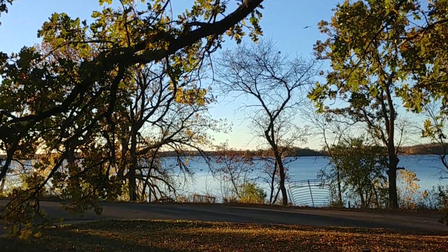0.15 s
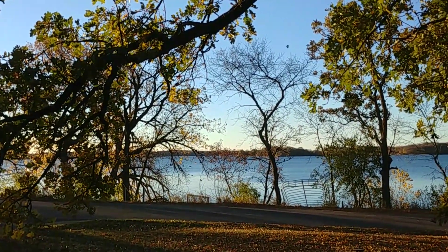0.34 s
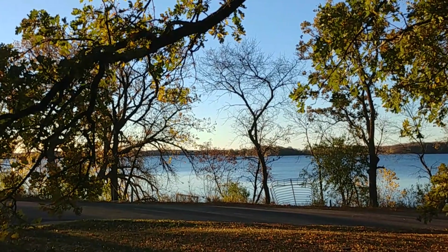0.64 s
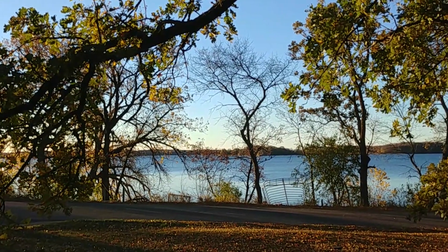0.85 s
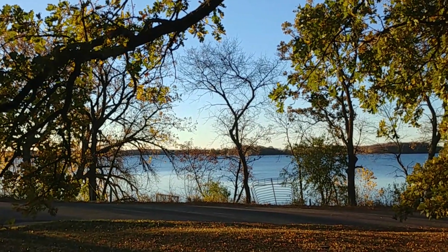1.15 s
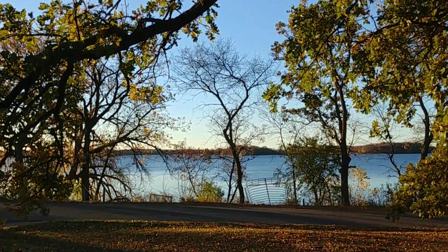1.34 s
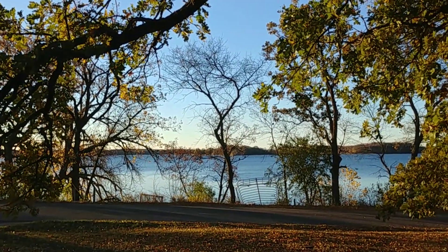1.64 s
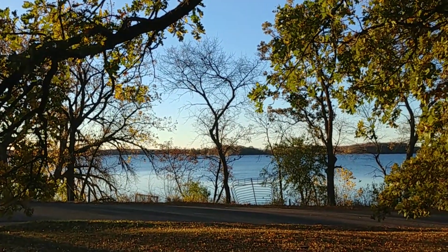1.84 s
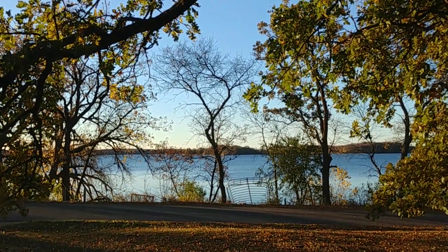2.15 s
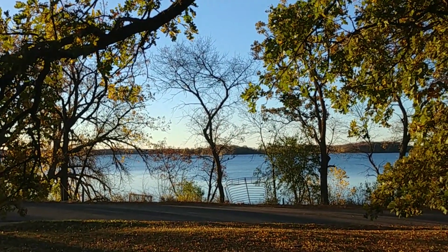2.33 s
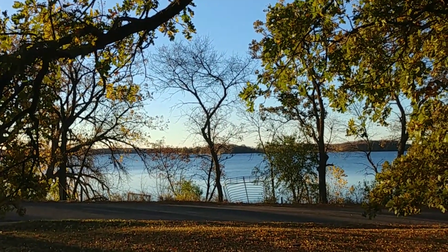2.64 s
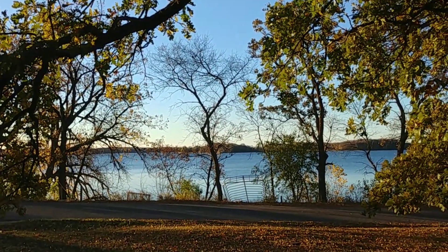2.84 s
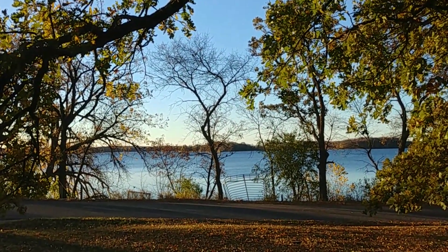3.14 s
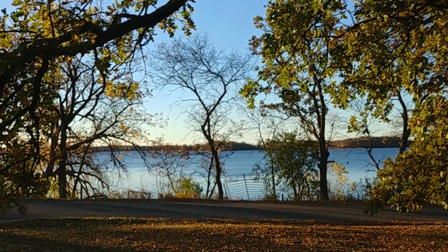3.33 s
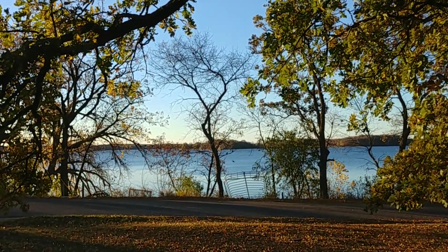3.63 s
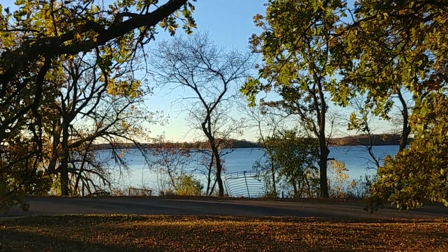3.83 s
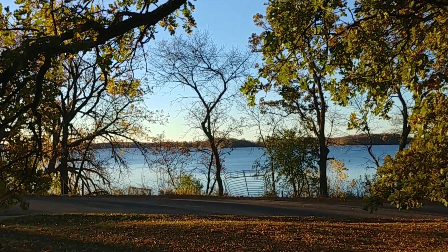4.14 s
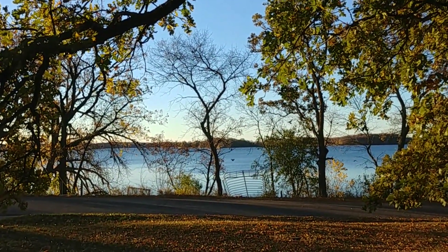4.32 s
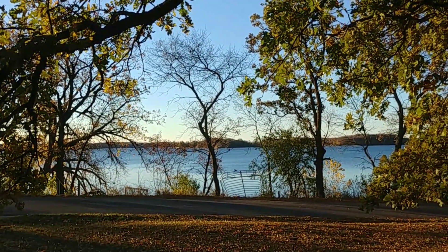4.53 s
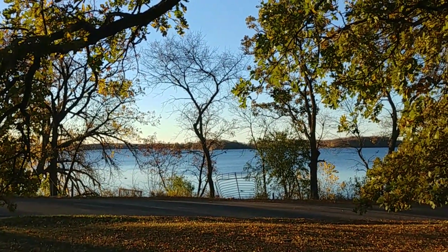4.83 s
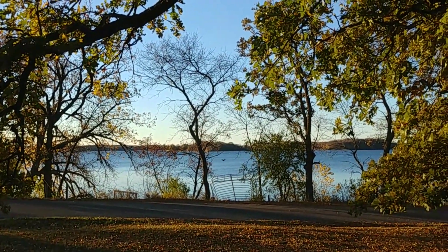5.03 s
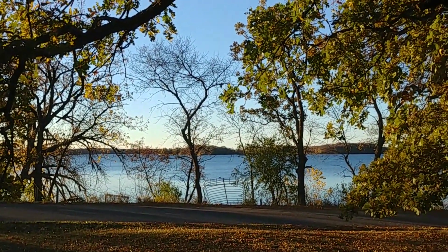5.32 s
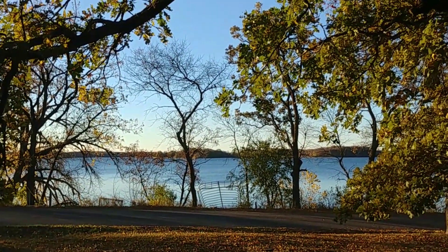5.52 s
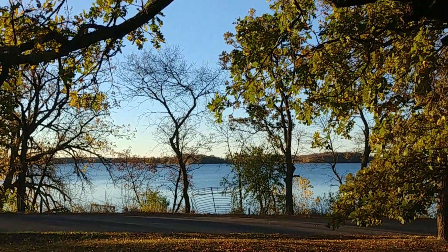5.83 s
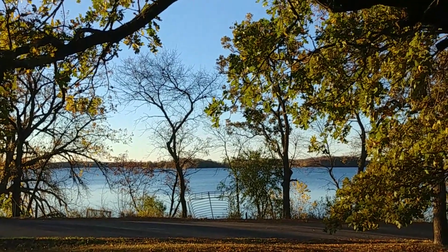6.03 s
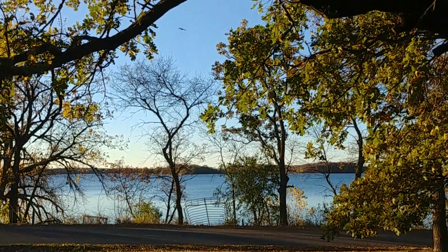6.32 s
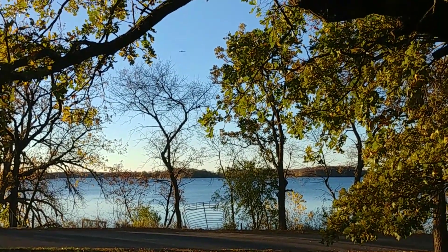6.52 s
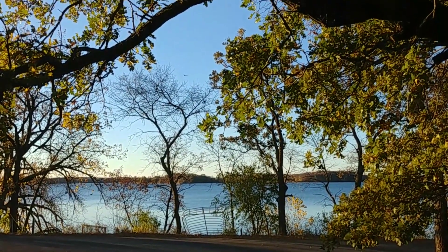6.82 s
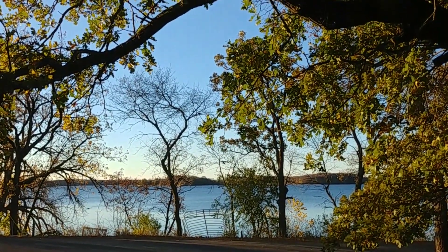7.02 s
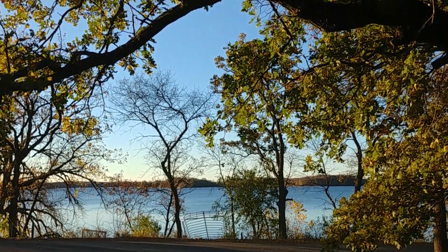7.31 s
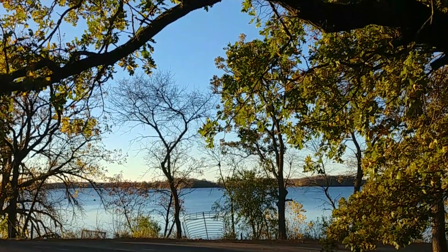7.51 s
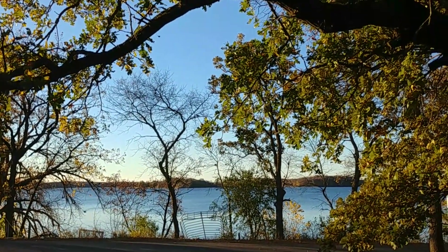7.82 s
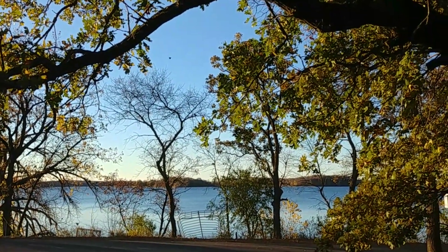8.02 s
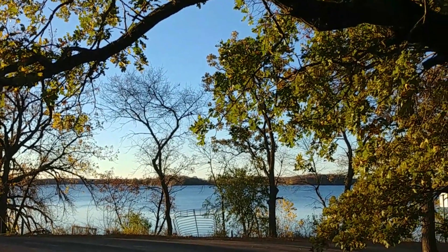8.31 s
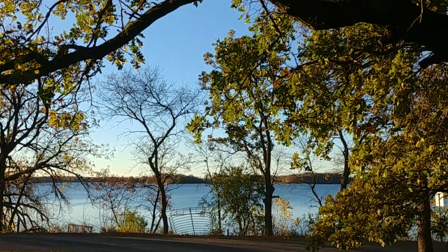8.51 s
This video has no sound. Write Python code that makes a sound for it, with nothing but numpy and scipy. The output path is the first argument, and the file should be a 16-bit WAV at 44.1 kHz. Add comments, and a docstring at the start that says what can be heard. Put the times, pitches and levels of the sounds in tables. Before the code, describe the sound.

A large flock of blackbirds chatters in lakeside trees for nearly nine seconds. Nearer birds overlap in short harsh calls, squeaky whistles and tiny pips, several each second, with a light echo from the trees. Behind them the distant flock makes a continuous blurred twittering that gently rises and falls.

The calls are busy in the first second, ease slightly between about 1 and 2 seconds, then carry on unevenly. The loudest stretch comes from about 5.5 to 6.7 seconds, with sharper chirps, a thin high whistle and three brief low clucks. The chatter continues, with more high whistles just after 8 seconds and a sharp raspy call near 8.6 seconds.

A faint distant rumble, soft hiss and very quiet electrical hum stay steady underneath. The sound is wide and open, with the nearer birds a little to the left.

```python
"""Blackbirds roosting in lakeside trees: harsh chacks, low chucks, squeaky whistles, short pips.
Uneven slaps of the voice membranes make the chacks, near-regular ones the chucks; whistles and pips
are trembling near-sines. Trunks and leaves scatter every call. Behind the near birds: blurred chatter
of the far flock, distant rumble, hiss, transformer hum. Two spaced microphones."""
import sys
import numpy as np
from scipy import signal
from scipy.fft import rfft, irfft, next_fast_len
from scipy.io import wavfile
from scipy.ndimage import uniform_filter1d

SR = 44100
rng = np.random.default_rng(int(sys.argv[2]) if len(sys.argv) > 2 else 0)


def output_pcm(signal):
    """Save a mono or channel-first signal as 16-bit PCM at the path in sys.argv[1].

    Samples are clipped to [-1, 1] before scaling.
    """
    pcm = np.clip(np.atleast_2d(signal).T, -1, 1) * 32767
    wavfile.write(sys.argv[1], SR, np.round(pcm).astype(np.int16))


N = 381906

# rumble and microphone hiss spectrum: f/Hz, relative density/dB
AIR_SPECTRUM = [(32, -35), (52, -1.5), (65, 0), (100, -2), (160, -7.5), (420, -11.5), (1200, -10.5),
                (8000, -19.5), (10500, -37), (13500, -24.5), (16000, -26.5)]
# left-right coherence of rumble and hiss: f/Hz, coherence/1
AIR_COHERENCE = [(60, 0.47), (200, 0.43), (700, 0.13), (1300, 0.059), (9000, 0), (15000, 0.35)]
# mains hum partials: f/Hz, level/dB
HUM_PARTIALS = [(120, -68.5), (240, -83.5)]
# far flock envelope: t/s, low-band level/dB, high-band level/dB
FAR_LEVELS = [(0.0, -54, -64), (0.53, -51.5, -61.5), (1.08, -54, -67.5), (1.61, -56, -66),
              (2.41, -49, -61.5), (2.72, -52.5, -65.5), (3.01, -53.5, -67.5), (3.98, -49.5, -60.5),
              (4.27, -58, -66), (4.75, -53.5, -59), (5.5, -48, -62.5), (5.67, -45, -50), (6.25, -52, -66),
              (6.68, -47.5, -62), (6.87, -50.5, -61.5), (7.96, -55, -65), (8.3, -48, -60.5),
              (8.66, -53, -67)]
# far flock spectrum: f/Hz, relative density/dB
FAR_SPECTRUM = [(410, -50.5), (700, -18.5), (1130, -12.5), (1280, -14.5), (1570, -5), (3110, -0.5),
                (3550, -1), (5400, -18), (6730, -20), (7770, -10), (8780, -25.5), (9800, -72),
                (12700, -101), (21600, -120)]
# where most birds sit: t/s, bearing/1 (-1 left, +1 right)
FLOCK_BEARING = [(0, .7), (5.3, .7), (5.6, -.6), (6.9, -.5), (7.2, .2)]
# throat response common to all chacks: f/Hz, gain/dB
THROAT_RESPONSE = [(500, -8.5), (791, -16), (1251, -11), (1766, -9), (2491, -3), (3133, -1), (3942, -4.5),
                   (4958, -14), (5561, -14.5), (6995, -14.5), (7846, -11.5), (8800, -20.5)]
# brief notes on one pitch: start t/s, f/Hz, level/dB, left over right/dB
PIPS = [(0.324, 2815, -39.5, 10), (0.338, 6100, -47.5, 7), (0.355, 2802, -42.5, 9.5),
        (0.437, 3500, -39, 1.5), (0.481, 2780, -40.5, 25), (0.545, 2950, -36.5, 5.5), (0.666, 2723, -32, 4),
        (0.7, 2865, -37, 14), (0.855, 2855, -43, 8), (1.035, 2820, -43.5, 14), (1.267, 2647, -43, 3.5),
        (1.303, 4010, -43, 18.5), (1.873, 3328, -37, 8.5), (1.893, 3320, -43, 15), (1.912, 3320, -47, 14),
        (2.3, 3250, -40, -3), (2.66, 6590, -55.5, -2), (3.024, 3570, -44, 14.5), (3.272, 3500, -42, 5),
        (3.75, 1873, -47, 7), (4.077, 3960, -43.5, 10.5), (4.785, 4530, -50, -3), (5.492, 2845, -34, 8.5),
        (5.893, 2590, -28.5, -1.5), (6.443, 4797, -41, 5), (6.872, 2496, -38, 4), (7.584, 3000, -40, 6),
        (8.452, 3040, -43, 6), (8.64, 7530, -41, -9)]
# voiced calls: centre t/s, length/s, pitch f/Hz, resonance f/Hz, level/dB
CHUCKS = [(5.543, 0.0215, 250, 1200, -46.5), (6.005, 0.028, 282.3, 1317, -44),
          (6.645, 0.024, 233, 1280, -41)]
# gliding notes: start t/s, length/s, start f/Hz, end f/Hz, level/dB
WHISTLES = [(0.06, 0.092, 4700, 4650, -59.5), (0.145, 0.13, 4560, 4520, -54), (0.27, 0.13, 4600, 4560, -53),
            (0.157, 0.18, 6670, 6930, -63), (0.375, 0.092, 7250, 7214, -51),
            (0.395, 0.09, 4050, 3130, -48.5), (0.5, 0.059, 3160, 3010, -38.5),
            (0.49, 0.106, 6250, 6160, -58), (0.543, 0.052, 4720, 4780, -62.5),
            (0.641, 0.072, 2774, 2740, -45.5), (1.05, 0.025, 3250, 3330, -46.5),
            (1.321, 0.1, 2006, 2024, -60), (1.415, 0.07, 3070, 2940, -55.5),
            (1.445, 0.065, 3660, 3800, -53), (1.45, 0.035, 2620, 2680, -52),
            (1.455, 0.077, 4170, 4050, -55.5), (1.56, 0.094, 4010, 4020, -60),
            (1.76, 0.085, 3700, 3680, -56), (1.85, 0.081, 3300, 3322, -47.5),
            (1.98, 0.089, 3535, 3500, -52), (2.093, 0.1, 7730, 7400, -54.5),
            (2.424, 0.0482, 3457, 3412, -43.5), (2.505, 0.083, 7770, 7700, -53),
            (2.615, 0.062, 4480, 4470, -48), (2.76, 0.049, 6150, 6150, -56.5),
            (2.8, 0.095, 7200, 4870, -56.5), (2.875, 0.055, 5100, 4730, -55.5),
            (2.925, 0.047, 4400, 4294, -54), (2.998, 0.081, 3570, 3535, -49),
            (3.09, 0.074, 3520, 3480, -63), (3.352, 0.041, 3440, 3300, -44),
            (3.455, 0.022, 3850, 3700, -55), (3.466, 0.025, 4470, 4470, -55), (3.5, 0.032, 3670, 3800, -54),
            (3.81, 0.026, 4600, 4573, -56), (3.849, 0.123, 7390, 7560, -62),
            (3.975, 0.04, 3900, 3976, -45.5), (4.093, 0.031, 3680, 3650, -45),
            (4.123, 0.0216, 3850, 3930, -45), (4.26, 0.14, 7620, 7640, -67),
            (4.307, 0.063, 3500, 3450, -50.5), (4.39, 0.12, 3460, 3470, -59),
            (4.183, 0.0106, 1460, 1480, -50), (4.472, 0.065, 4600, 4390, -50),
            (4.527, 0.067, 4020, 3130, -47), (4.76, 0.21, 7670, 7830, -72.5),
            (4.83, 0.12, 1604, 1725, -50.5), (5.0, 0.165, 4270, 4540, -55),
            (5.181, 0.11, 4530, 4600, -53.5), (5.01, 0.057, 3790, 3850, -53.5),
            (5.3, 0.048, 3500, 3400, -46.5), (5.345, 0.11, 3420, 3370, -43.5),
            (5.35, 0.0767, 2480, 2611, -49), (5.65, 0.03, 2850, 2834, -39), (5.61, 0.095, 6620, 7294, -50),
            (5.669, 0.12, 7840, 7500, -43), (5.71, 0.061, 709, 724, -64.5),
            (5.79, 0.122, 3330, 3564, -51.5), (5.9, 0.058, 2587, 2590, -42.5),
            (6.445, 0.0625, 3200, 3203, -46.5), (6.511, 0.0833, 3340, 3256, -45.5),
            (6.528, 0.09, 5050, 5000, -59.5), (6.256, 0.04, 3130, 3130, -46.5),
            (6.412, 0.051, 2600, 2391, -44), (6.5, 0.12, 2540, 2600, -47.5),
            (6.85, 0.09, 6470, 7030, -57.5), (7.009, 0.12, 4550, 4500, -58),
            (7.495, 0.17, 6780, 6810, -59.5), (7.564, 0.054, 3020, 2980, -44.5),
            (7.735, 0.06, 3550, 3530, -59.5), (7.93, 0.057, 3100, 3150, -55),
            (7.975, 0.0386, 2650, 2700, -48.5), (8.0, 0.045, 3150, 3230, -45),
            (8.15, 0.049, 7230, 7180, -43), (8.225, 0.0573, 6860, 7210, -50),
            (8.29, 0.065, 3850, 3820, -54), (8.39, 0.06, 3720, 3800, -52), (8.485, 0.15, 7800, 7100, -63)]
# harsh calls: centre t/s, length/s, band centre f/Hz, spread/octaves, level/dB
CHACKS = [(0.042, 0.061, 3030, 0.71, -50.5), (0.148, 0.088, 3820, 0.16, -49.5),
          (0.259, 0.058, 4320, 0.341, -44.5), (0.383, 0.09, 2680, 0.25, -46),
          (0.373, 0.075, 6600, 0.1, -46.5), (0.375, 0.043, 5020, 0.22, -42),
          (0.449, 0.14, 2390, 0.167, -50), (0.521, 0.0602, 3170, 0.27, -39.5),
          (0.523, 0.057, 5270, 0.18, -40.5), (0.681, 0.045, 1504, 0.525, -46),
          (0.721, 0.087, 3370, 0.41, -41.5), (0.716, 0.078, 5520, 0.38, -41.5),
          (0.79, 0.029, 2184, 0.8, -50), (0.837, 0.0365, 1063, 0.54, -50.5),
          (0.889, 0.057, 3080, 0.43, -40.5), (1.035, 0.032, 2089, 0.25, -50.5),
          (1.077, 0.0675, 3000, 0.39, -45), (1.201, 0.096, 3020, 0.33, -59.5),
          (1.298, 0.1096, 2043, 0.77, -48.5), (1.335, 0.0727, 4060, 0.14, -47.5),
          (1.428, 0.044, 7480, 0.217, -51.5), (1.446, 0.064, 4340, 2, -46.5),
          (1.57, 0.134, 7840, 0.044, -64.5), (1.603, 0.043, 1431, 0.45, -58),
          (1.729, 0.054, 2190, 0.62, -55), (1.838, 0.0506, 6540, 0.18, -60.5),
          (1.945, 0.061, 3700, 0.2446, -44.5), (2.07, 0.0534, 2000, 1, -51.5),
          (2.248, 0.055, 2975, 0.24, -44.5), (2.327, 0.075, 2953, 0.29, -43),
          (2.462, 0.1162, 3400, 0.27, -49.5), (2.539, 0.056, 1650, 0.72, -50.5),
          (2.572, 0.2, 8830, 0.135, -57), (2.669, 0.104, 4640, 0.1166, -50.5),
          (2.777, 0.026, 3760, 0.58, -46.5), (2.931, 0.034, 2850, 0.335, -54),
          (2.857, 0.04, 6020, 0.164, -52), (2.97, 0.039, 2615, 0.229, -46.5),
          (3.052, 0.043, 3326, 0.18, -48.5), (3.152, 0.034, 1734, 0.41, -53),
          (3.184, 0.029, 2850, 0.22, -53), (3.222, 0.0487, 3910, 0.19, -46),
          (3.278, 0.0202, 3467, 0.14, -44), (3.315, 0.07, 2570, 0.634, -46.5),
          (3.362, 0.071, 2992, 0.27, -48), (3.509, 0.049, 3100, 0.25, -52),
          (3.639, 0.0305, 2010, 0.71, -47), (3.696, 0.052, 3530, 0.33, -45),
          (3.76, 0.066, 2184, 0.553, -51.5), (3.887, 0.085, 3964, 0.16, -43.5),
          (3.989, 0.097, 3577, 0.096, -46), (4.1, 0.0417, 2360, 1.2, -47), (4.197, 0.022, 3920, 0.315, -46),
          (4.335, 0.0656, 8740, 0.109, -57), (4.345, 0.076, 3959, 0.158, -51),
          (4.39, 0.05, 6150, 0.049, -61), (4.569, 0.07, 3022, 0.56, -42.5), (4.66, 0.058, 6270, 0.31, -54),
          (4.79, 0.063, 6440, 0.46, -59.5), (4.853, 0.0475, 2200, 0.3, -49), (4.915, 0.09, 2900, 0.26, -45),
          (4.939, 0.039, 1100, 0.66, -49), (4.972, 0.0438, 5920, 1.3, -54.5),
          (5.073, 0.0465, 2965, 0.262, -43.5), (5.097, 0.049, 6523, 0.084, -55.5),
          (5.201, 0.0374, 1820, 0.505, -52.5), (5.25, 0.0874, 3200, 0.25, -47),
          (5.35, 0.0378, 1980, 0.72, -47), (5.409, 0.099, 2833, 0.182, -44.5),
          (5.485, 0.073, 1941, 0.58, -49.5), (5.543, 0.028, 2830, 0.25, -33),
          (5.545, 0.03, 5460, 0.37, -43), (5.59, 0.044, 2400, 0.87, -40.5), (5.611, 0.035, 3085, 0.27, -39),
          (5.615, 0.04, 5940, 0.5, -40), (5.689, 0.0914, 6436, 1.16, -42.5),
          (5.74, 0.0763, 8980, 0.15, -52), (5.775, 0.07, 2220, 0.76, -44.5),
          (5.875, 0.046, 5740, 0.15, -56), (5.924, 0.072, 1928, 0.53, -44),
          (6.01, 0.0318, 2180, 0.279, -39), (6.047, 0.0533, 2010, 1.43, -51.5),
          (6.145, 0.1, 2470, 1.1, -45.5), (6.241, 0.039, 1900, 0.592, -45.5),
          (6.396, 0.083, 2021, 0.36, -47.5), (6.546, 0.084, 3200, 0.39, -45.5),
          (6.605, 0.064, 6663, 0.34, -50.5), (6.645, 0.039, 2428, 1.4, -37),
          (6.736, 0.0585, 3320, 0.69, -43.5), (6.836, 0.093, 2002, 0.6, -49),
          (6.88, 0.082, 2410, 0.33, -44.5), (7.014, 0.053, 1359, 0.51, -54),
          (7.087, 0.0773, 4563, 0.0706, -52.5), (7.269, 0.062, 1345, 0.885, -49.5),
          (7.389, 0.097, 3860, 0.27, -45), (7.466, 0.091, 2890, 0.22, -43),
          (7.469, 0.0896, 6850, 0.19, -49.5), (7.625, 0.065, 3480, 0.36, -45.5),
          (7.75, 0.044, 2820, 0.62, -67), (7.819, 0.062, 4140, 0.22, -46.5),
          (8.043, 0.073, 2226, 0.696, -47.5), (8.105, 0.033, 4300, 0.19, -47.5),
          (8.177, 0.056, 1186, 0.44, -54), (8.18, 0.05, 6200, 0.073, -57), (8.205, 0.1107, 7600, 0.18, -54),
          (8.208, 0.09, 2900, 0.42, -48), (8.39, 0.09, 3440, 0.47, -47), (8.421, 0.13, 7853, 0.086, -49.5),
          (8.453, 0.08, 3610, 0.3, -45), (8.621, 0.039, 4600, 0.19, -37.5),
          (8.631, 0.045, 4900, 1.35, -38.5)]


def gain_of(db):
    """dB to amplitude factor."""
    return 10 ** (np.asarray(db) / 20)


def unit_rms(x):
    """Scale to rms 1."""
    return x / np.sqrt(np.mean(x ** 2) + 1e-20)


def curve_at(points, hz):
    """Interpolate over log frequency."""
    f, value = np.transpose(points)
    return np.interp(np.log(hz + 1), np.log(f + 1), value)


def wander(count, smooth_s):
    """Smooth random motion, rms 1."""
    span = max(round(smooth_s * SR), 1)
    noise = rng.standard_normal(count + 2 * span)
    return unit_rms(uniform_filter1d(uniform_filter1d(noise, span), span)[span:-span])


def flock_bearing(t_s):
    """Mean bearing of the birds."""
    return np.interp(t_s, *np.transpose(FLOCK_BEARING))


def lean_db(hz):
    """Random left-over-right level; low voices lean further left."""
    return 3.5 - 1.5 * np.log2(hz / 3000) + 2 * rng.standard_normal()


def place(mix, start_s, call, pan_db, bearing=None, max_lag_s=.0004):
    """Add a call; its bearing (default: near the flock's) sets the lag between microphones."""
    if bearing is None:
        bearing = rng.normal(flock_bearing(start_s), .5)
    lag_s = np.clip(bearing, -1, 1) * max_lag_s
    for side, sign in enumerate((1, -1)):
        at = round((start_s + sign * lag_s / 2) * SR)
        part = mix[side, max(at, 0):max(at + len(call), 0)]
        part += gain_of(sign * pan_db / 2) * call[max(-at, 0):][:len(part)]


def air(level_db=-62.5):
    """Distant rumble and microphone hiss, partly coherent in the bass and top treble."""
    f = np.fft.rfftfreq(N, 1 / SR)
    left, other = rfft(rng.standard_normal((2, N)))
    coherence = np.clip(curve_at(AIR_COHERENCE, f), -1, 1)
    right = coherence * left + np.sqrt(1 - coherence ** 2) * other
    spectrum = np.array([left, right]) * gain_of(curve_at(AIR_SPECTRUM, f))
    return gain_of(level_db) * unit_rms(irfft(spectrum, N)) * gain_of([[1.5], [-1.5]])


def transformer_hum():
    """Far transformer; level wavers on the way."""
    t = np.arange(N) / SR
    tone = sum(gain_of(db + wander(N, 0.1)) * np.sqrt(2) * np.sin(2 * np.pi * hz * t)
               for hz, db in HUM_PARTIALS)
    return tone * gain_of([[2.2], [-2.2]])


def tree_echoes(x, t60_s):
    """Scatter off trunks and leaves: sparse random-sign taps, separate per microphone."""
    grid = np.arange(60, SR // 2, 20)
    at = grid + rng.integers(0, 20, (2, len(grid)))
    taps = np.zeros((2, SR // 2 + 20))
    np.put_along_axis(taps, at, rng.choice([-1., 1.], at.shape) * gain_of(-60 * at / SR / t60_s), 1)
    return signal.fftconvolve(x, taps / np.linalg.norm(taps[0]), axes=1)[:, :N]


def far_flock(count=640, lowest_whistle_hz=2400, split_hz=5500):
    """Stream of overlapping calls; distance gives them one common colour."""
    calls = np.zeros((2, N))
    for slot, (jitter, kind, long, high, loud, side) in enumerate(rng.random((count, 6))):
        hz = 1400 * 2 ** (2.6 * high ** .75)
        if kind < .45 and hz > lowest_whistle_hz:
            call = 0.5 * whistle(0.015 + 0.05 * long, hz, hz * (1 - 0.0431 * side),
                                 hz * (1 - 0.088 * side))
        else:
            call = chack(.02 + .035 * long, hz, 0.36 - 0.15 * high)
        start_s = (slot + jitter) / count * N / SR - .04
        place(calls, start_s, gain_of(1.8 * loud) * call, pan_db=3 + 2.8 * (2 * side - 1))
    f = np.fft.rfftfreq(N, 1 / SR)
    spectrum = rfft(1.05 * calls + tree_echoes(calls, t60_s=0.814))
    magnitude = np.sqrt(uniform_filter1d((abs(spectrum) ** 2).mean(0), 4001))
    spectrum = spectrum / (magnitude + 1e-9) * gain_of(curve_at(FAR_SPECTRUM, f))  # whiten, recolour
    t_s, low_db, high_db = np.transpose(FAR_LEVELS)
    return sum(unit_rms(irfft(spectrum * band, N)) * gain_of(np.interp(np.arange(N) / SR, t_s, db))
               for band, db in ((f < split_hz, low_db), (f >= split_hz, high_db)))


def chuck(length_s, pitch_hz, resonance_hz, spread_oct=0.44):
    """Near-regular membrane slaps, sagging in pitch, through one broad throat resonance."""
    t = np.arange(-length_s, length_s, 1 / SR)
    cycles = np.cumsum(pitch_hz * (1 - 0.656 * t + 0.066 * wander(len(t), 0.00247))) / SR
    harmonic = np.arange(2, 14)[:, None]
    strength = np.exp(-(np.log2(harmonic * pitch_hz / resonance_hz) / spread_oct) ** 2 / 4)
    phase = 2 * np.pi * (harmonic * cycles + 0.51 * rng.random(harmonic.shape))
    stack = (strength * np.cos(phase)).sum(0)
    flutter = gain_of(4 * wander(len(t), 0.00186))
    return unit_rms(stack * flutter) * np.exp(-(2 * t / length_s) ** 2 / 2)


def whistle(length_s, start_hz, middle_hz, end_hz, steady_after_s=0.0835):
    """Near-sine on a bent glide; level flutters, pitch trembles (less in long notes)."""
    n = round((length_s + 0.0044) * SR)
    glide = np.polyfit([0, .5, 1], [start_hz, middle_hz, end_hz], 2)
    tremble = 0.01 * min(steady_after_s / length_s, 1) * wander(n, 0.0042)
    hz = np.polyval(glide, np.linspace(0, 1, n)) * (1 + tremble)
    flutter_db = min(length_s / 0.069, 1) * (1.8 * wander(n, 0.011) + 3.1 * wander(n, 0.00202))
    tone = np.sin(2 * np.pi * (np.cumsum(hz) / SR + rng.random()))
    return unit_rms(tone * gain_of(flutter_db)) * signal.windows.tukey(n, min(0.03 / length_s, 1))


def chack_colour(f, length_s, centre_hz, spread_oct):
    """Broad throat band with narrow resonances; also a faint top hiss that rises with each call."""
    band = np.exp(-(np.log2((f + 1) / centre_hz) / spread_oct) ** 2 / 4) + 0.43 * (f > 10000)
    response = [(330, -41.5)] + THROAT_RESPONSE + [(9600, -39), (10800, -49), (13500, -36.5)]
    resonances_db = 3.438 * wander(len(f), length_s / 12)
    return band * gain_of(curve_at(response, f) + resonances_db)


def chack(length_s, centre_hz, spread_oct, noise_mix=0.4, treble_hz=4600):
    """Each uneven slap of the voice membranes sets off a short squeak; breath noise fills in."""
    t = np.arange(-.8 * length_s, .8 * length_s, 1 / SR)
    n, tail = len(t), np.arange(512)
    size = next_fast_len(n + len(tail))
    f = np.fft.rfftfreq(size, 1 / SR)
    colour = chack_colour(f, length_s, centre_hz, spread_oct)
    slap_hz = rng.uniform(220, 330) * (1 + .2 * wander(n, .004))
    slap_at = np.flatnonzero(np.diff(np.floor(np.cumsum(slap_hz) / SR + .9), prepend=0))
    pitch, ring, bend, loud = rng.random((len(slap_at), 4)).T[:, :, None]
    odds = np.cumsum(colour ** 3 * (f < 9000))  # squeaks fall where the throat is strong
    squeak_hz = np.interp(pitch, odds / odds[-1], f)
    age_s = tail / SR
    cycles = squeak_hz * age_s * (1 + 13.25 * (bend - .5) * age_s)
    envelope = np.exp(-(age_s / (0.00109 + 0.0019 * ring) - 2) ** 2)
    squeaks = gain_of(2.3 * loud) * np.sin(2 * np.pi * cycles) * envelope
    voice = np.bincount((slap_at[:, None] + tail).ravel(), squeaks.ravel(), size)[:n]
    slaps = np.bincount(slap_at, loud[:, 0], n)
    noise = irfft(rfft(0.312 * unit_rms(slaps) + rng.standard_normal(n), size) * colour, size)[:n]
    spectrum = rfft(unit_rms((1 - noise_mix) * unit_rms(voice) + noise_mix * unit_rms(noise)), size)
    skew = np.where(t < 0, 0.88, 1)  # rise faster than decay
    bands = (f < treble_hz, length_s), (f >= treble_hz, 0.82 * length_s)  # treble is briefer
    return sum(irfft(spectrum * band, size)[:n] * np.exp(-abs(2 * t / span_s / skew) ** 1.98 / 2)
               for band, span_s in bands)


def near_birds(pip_s=0.018, full_lag_pan_db=16):
    """Foreground chacks, whistles, chucks and pips, without echoes."""
    out = np.zeros((2, N))
    for t_s, length_s, hz, spread_oct, db in CHACKS:
        place(out, t_s - .8 * length_s, gain_of(db) * chack(length_s, hz, spread_oct), lean_db(hz))
    for t_s, length_s, start_hz, end_hz, db in WHISTLES:
        middle_hz = start_hz + .62 * (end_hz - start_hz)
        call = gain_of(db) * whistle(length_s, start_hz, middle_hz, end_hz)
        place(out, t_s, call, lean_db(start_hz), flock_bearing(t_s))
    for t_s, length_s, pitch_hz, resonance_hz, db in CHUCKS:
        call = gain_of(db) * chuck(length_s, pitch_hz, resonance_hz)
        place(out, t_s - length_s, call, lean_db(resonance_hz))
    for t_s, hz, db, pan_db in PIPS:
        place(out, t_s, gain_of(db) * whistle(pip_s, hz, hz, hz), pan_db, pan_db / full_lag_pan_db)
    return out


def scene():
    """Near calls with short and long echoes over far flock, air and hum."""
    near = near_birds()
    echoes = gain_of(-4.5) * tree_echoes(near, t60_s=0.12)
    echoes += gain_of(-12.5) * tree_echoes(near, t60_s=0.37)
    return gain_of(-1.0) * near + echoes + far_flock() + air() + transformer_hum()


def record(dry, cutoff_hz=15800):
    """Low-pass band limit."""
    lowpass = signal.firwin(511, cutoff_hz, window=("kaiser", 9), fs=SR)
    return signal.oaconvolve(dry, lowpass[None], "same")


dry = scene()
out = record(dry)
output_pcm(out)
```